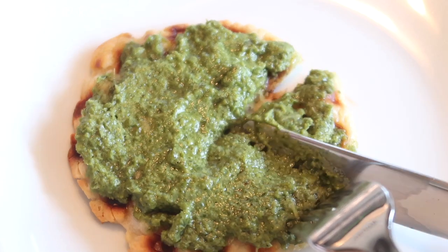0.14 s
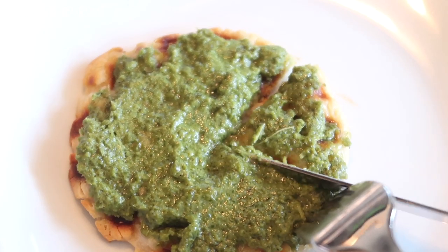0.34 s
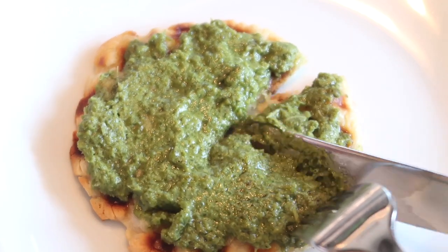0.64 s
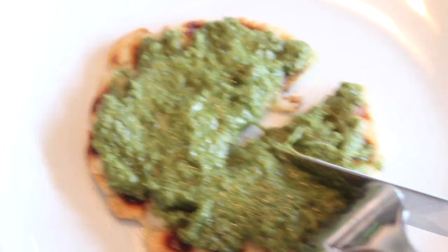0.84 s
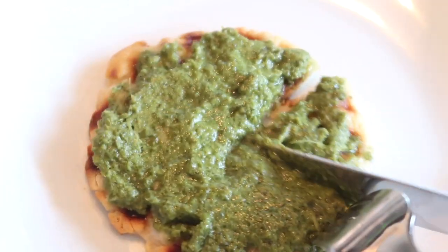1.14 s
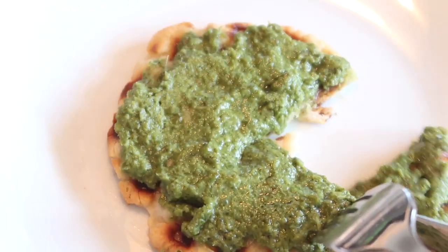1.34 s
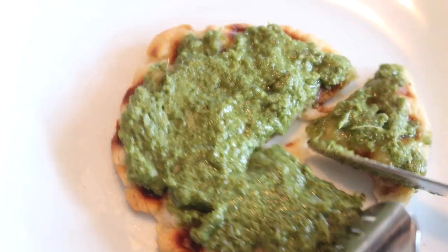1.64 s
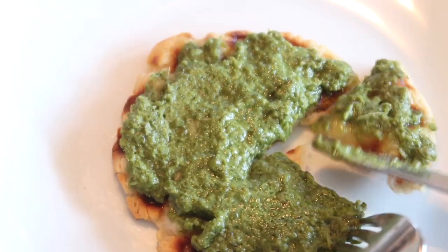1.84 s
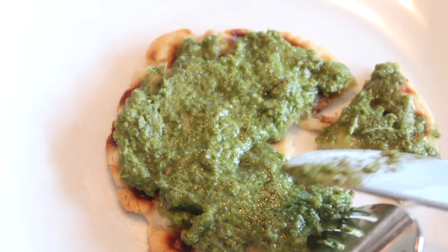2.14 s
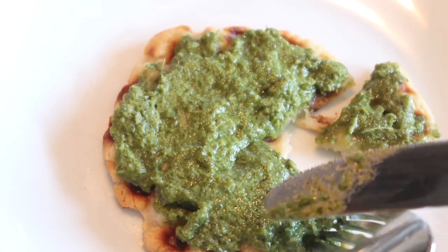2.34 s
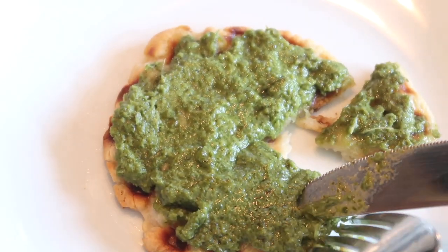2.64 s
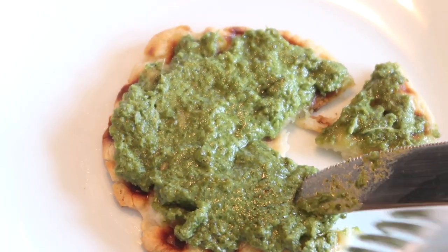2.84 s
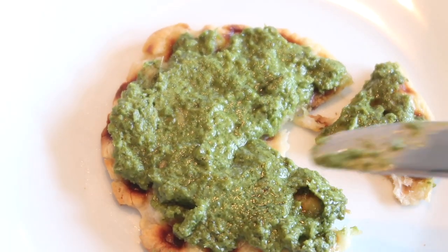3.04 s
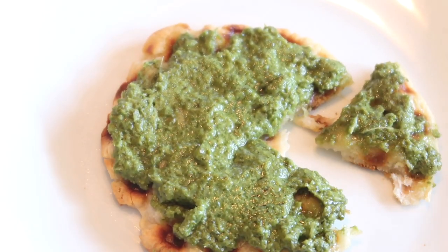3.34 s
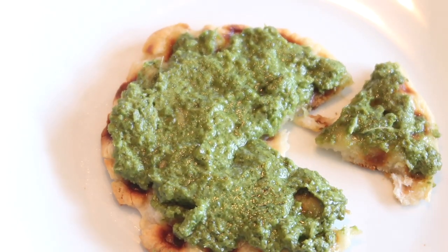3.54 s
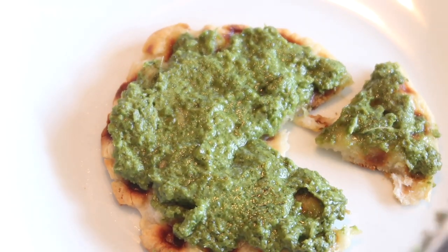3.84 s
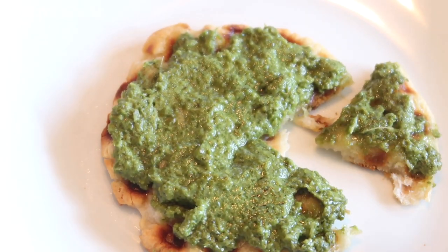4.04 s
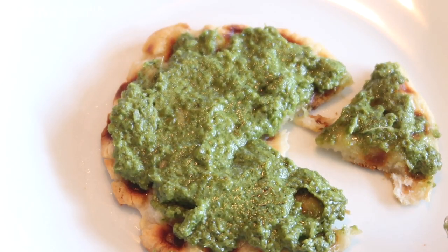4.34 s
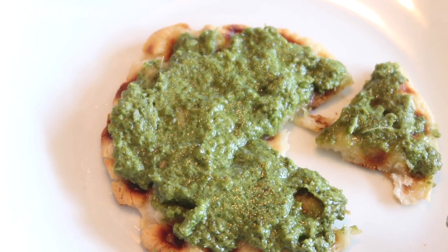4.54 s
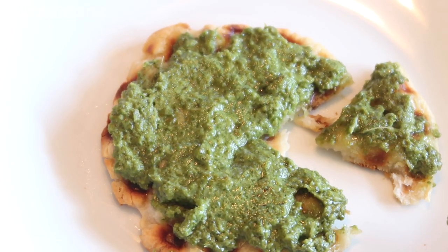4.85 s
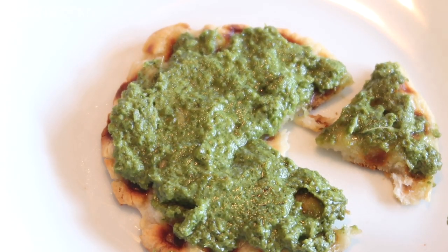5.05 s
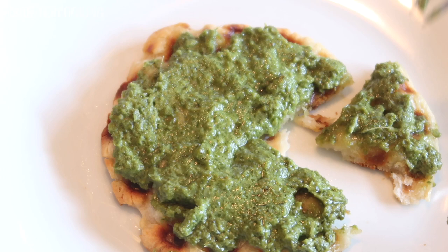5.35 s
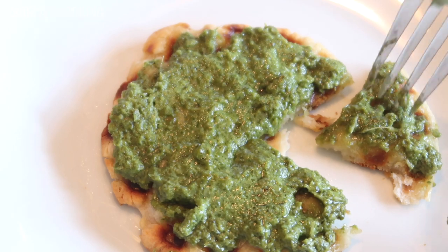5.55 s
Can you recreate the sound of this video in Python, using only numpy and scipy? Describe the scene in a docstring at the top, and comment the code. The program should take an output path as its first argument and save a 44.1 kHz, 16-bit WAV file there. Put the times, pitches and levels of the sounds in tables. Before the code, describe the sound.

Quiet gritty sawing and dull plate taps come first, with one sharper tap early on. Bright steel clinks and a light scrape follow. Near the end, knife and fork land on wood with hard knocks and a rattle that quickly settles. Close microphones, short room reflections, low appliance hum, faint high whine.

```python
"""A steel knife saws a small pizza on a china plate, is wiped on a fork, and both are laid on a wooden table.
Every contact rings damped modes of the steel, the plate or the table top, with a noise burst added.
Low thumps come through the microphone stand; a small kitchen answers with dense, decaying reflections.
Below lie a wavering appliance hum with droning bands, coloured room noise and a thin electronic whine.
Two close microphones listen."""
import sys
import numpy as np
from scipy import signal
from scipy.fft import rfft, irfft
from scipy.io import wavfile
from scipy.ndimage import uniform_filter1d

SR = 44100
rng = np.random.default_rng(int(sys.argv[2]) if len(sys.argv) > 2 else 0)


def boost(x):
    """Linear amplitude factor 10**(x/20) for a level x in decibels (scalar or array-like)."""
    u = np.asarray(x, float) / 20
    return 10 ** u


def put_to_file(sound):
    """Save the sound as 16-bit audio at rate SR, in the file named by the first command-line argument."""
    columns = np.atleast_2d(sound).T  # one column per channel
    safe = np.clip(columns, -1, 1)
    whole_steps = np.round(safe * 32767)
    wavfile.write(sys.argv[1], SR, whole_steps.astype(np.int16))


N = 250784

# All levels in the tables are relative: the gains of the signal path come on top. Contacts: taps on the plate
# (with one knock on the table at 2.97 s), clinks of the gripped cutlery, drops of the free cutlery on the
# table. Each row: start in seconds, crack level in dB, favoured pitch in Hz, ring level in dB, table push in
# dB.
TAPS = [(.023, -68, 1920, -52.5, -50), (.400, -25, 1810, -44, -30), (.402, -25, 4980, -48, -48),
        (.872, -48, 2900, -65, -29.5), (1.025, -49, 2530, -55, -38), (1.122, -54, 2400, -66, -25.5),
        (1.465, -51, 2810, -43.5, -48), (1.491, -45, 1710, -48, -28), (1.943, -34, 4200, -40, -47),
        (1.946, -44, 1280, -56, -50), (2.973, -55, 1151, -50, -46), (3.04, -52, 6430, -64, -36),
        (3.065, -41.5, 2580, -41.5, -25)]
KNIFE_CLINKS = [(2.243, -21, 2760, -29, -45), (2.333, -28, 1320, -42.5, -50),
                (2.338, -30.5, 6210, -56, -58)]
FORK_CLINKS = [(2.500, -19, 9150, -24, -43), (2.586, -52, 8740, -40.5, -55), (2.616, -29, 1660, -45, -50),
               (2.622, -37, 2880, -43, -57), (2.712, -43, 7200, -51, -57)]
KNIFE_DROPS = [(3.743, -29.5, 1390, -51, -5), (3.969, -63, 1390, -76, -36), (4.171, -16, 2780, -19, -17.5),
               (4.180, -14, 4130, -40, -37)]
FORK_DROPS = [(4.327, -22.5, 2550, -39.5, -43), (4.329, -32, 511, -29, -45), (4.332, -24.5, 3660, -43, -49),
              (4.387, -34, 2620, -40.5, -36), (4.431, -7.5, 4200, -25, -21),
              (4.438, -12.5, 1002, -24, -26.5), (4.445, -13, 2400, -18.5, -25),
              (4.452, -30, 6900, -27.5, -26), (4.482, -36, 5600, -43, -43), (4.501, -36, 2240, -45, -31),
              (4.520, -25.5, 3230, -49, -30), (4.540, -39.5, 490, -42, -30), (4.565, -43, 2250, -48, -36),
              (4.600, -44, 3690, -64, -28.5), (4.622, -54, 2240, -59, -36), (4.653, -54, 1280, -76, -30),
              (4.706, -63, 500, -69, -33.5)]
# The fork rocks to rest. Each row: time in seconds, steel level in dB, table level in dB.
ROCKING = [(4.46, -29, -15), (4.478, -22, -26.5), (4.538, -34, -23), (4.578, -41, -38), (4.73, -77, -47),
           (4.8, -84, -42)]
# Spectrum of contact noise. Each row: frequency in Hz, density in dB per Hz.
CRACK = [(500, 2.5), (1500, -15), (3000, 0), (6000, -3), (10000, -8.5), (12500, -9), (15000, -23)]


def plate():
    """Forced vibration: taps and knife teeth drive the damped plate; its lowest mode hums under pressure."""
    # Plate under the food. Each row: frequency in Hz, bandwidth in Hz, level in dB.
    plate_modes = [(834, 184, 12), (1630, 46, -6), (1810, 67, -6), (1910, 32, -10), (2420, 145, 3),
                   (3088, 40, -4.5), (3440, 25, -11), (4830, 40, -18), (5400, 120, -6), (6300, 30, -14),
                   (6900, 39, -27), (8300, 23, -19), (8760, 19, -23), (8600, 60, -11), (1280, 6, -14.5),
                   (2692, 120, -1), (4200, 21, -19), (4980, 13, -13.5)]
    # a resonance decays faster the wider it is
    modes = [(hz, db, np.log(1000) / (np.pi * width)) for hz, width, db in plate_modes]
    lowest = modes[:1]
    middle = [mode for mode in modes if 1000 < mode[0] < 4000]
    top = [mode for mode in modes if mode[0] > 4000]
    edge, low, fine, spot_hz = strokes()
    out = struck(modes, TAPS, focus_db=4.0, rise_t60=0.003)
    for group, gain in ((lowest, low), (middle, 0.31 * edge), (top, 1.37 * fine)):
        teeth = rubbed(group, gain, per_s=2500.0)
        for hz, level_db, t60 in group:
            # the favoured mode wanders as the edge moves across the plate
            moving = boost(level_db + favoured(hz, spot_hz, boost_db=14.0, octaves=0.19))
            out += ring(moving * teeth, hz, np.clip(t60, .01, .5))
    # part of the drag is plain hiss of steel on glaze
    hiss = rms_one(coloured(grit(3000.0, spread_db=2.5), lambda hz: at_hz(CRACK, hz)))
    return out + (0.25 * edge + .25 * fine) * hiss


def strokes():
    """Friction follows pressure: strokes press in, hold and lift; the strongest sets edge level and pitch."""
    # Strokes of the serrated edge over the plate. Each row: time of full pressure in seconds,
    # hold in seconds, edge level in dB, plate hum level in dB, favoured pitch in Hz.
    sawing = [(.032, .004, -48.5, -73, 2160), (0.093, .004, -53.5, -56, 2610),
              (0.873, .004, -57, -50, 2633), (0.941, .004, -52, -70, 2440), (1.000, .004, -65, -49, 2390),
              (1.055, 0.037, -50, -54, 2430), (1.142, .008, -48.5, -51.5, 2290),
              (1.246, 0.0036, -49, -46.5, 2400), (1.302, 0.058, -46.5, -54, 2390),
              (1.347, 0.062, -49, -44.5, 2840), (1.577, .022, -42, -43, 3060),
              (1.594, .012, -41, -40.5, 2920), (1.624, .02, -50, -45, 2420), (1.708, .004, -58, -65, 2700)]
    press_db_per_s, lift_db_per_s = 420.0, 327
    # fine grit at an edge level of -50 dB, and dB gained per dB of edge
    grit_db, grit_growth = -66.5, 1.43
    s, hold, edge_db, low_db, spot_hz = np.array(sawing).T[:, :, None]
    t = np.arange(N) / SR
    loss_db = press_db_per_s * np.maximum(s - t, 0) + lift_db_per_s * np.maximum(t - s - hold, 0)
    edge_db = edge_db - loss_db
    strongest_db = edge_db.max(axis=0)
    strongest_low_db = (low_db - loss_db).max(axis=0)
    fine_db = grit_db + grit_growth * (strongest_db + 50)
    spot_hz = uniform_filter1d(spot_hz[edge_db.argmax(axis=0), 0], size=800)
    return boost(strongest_db), boost(strongest_low_db), boost(fine_db), spot_hz


def cutlery():
    """Boundary conditions set the modes: a grip damps the steel and picks other modes than lying free."""
    # Modes of knife and fork. Each row: frequency in Hz, level in dB, t60 in seconds before any cap.
    gripped_knife = [(830, -13, .1), (1320, -19, .22), (2482, -3, .085), (2902, -16, .12), (3483, -6, .15),
                     (3763, -14, .15), (4253, -2, .07), (4673, -14, .12), (4845, -14, .15), (5103, -7, .09),
                     (6068, -1, .16), (7817, -16, .16), (8619, -15, .1), (9351, -16, .08),
                     (12220, -16, .06)]
    gripped_fork = [(1345, -16, .12), (1660, -19, .2), (2880, -14, .1), (3219, -8, .05), (3745, 0, .09),
                    (4180, -7, .09), (5095, -5, .05), (5265, -2, .1), (6040, -14, .1), (7120, -18, .15),
                    (7900, -16, .08), (8780, -14, .12), (9345, -16, .07), (9800, -11, .13),
                    (11300, -16, .07), (11800, -8, .13), (13380, -12, .07)]
    free_knife = [(672, -7, 0.091), (872, -27.5, 0.51), (993, -20.5, 0.52), (2315, -4, 0.25),
                  (3120, -27, 0.44), (3483, 2, 0.22), (3800, -12, 0.18), (4163, 2, 0.085),
                  (4815, 0.5, 0.07), (6051, -23, 0.17), (6228, -17.5, 0.24), (6934, -17.5, 0.14),
                  (7990, -13.5, 0.21), (8120, -19.5, 0.073), (8830, -11, 0.059), (9720, -11, 0.2),
                  (10580, -35.5, 0.1), (11500, -23, 0.104)]
    free_fork = [(492, -4.5, 0.22), (1036, -10, 0.082), (1340, -12.5, 0.46), (2241, -12, 0.24),
                 (3538, 2.5, 0.12), (3230, -3.5, 0.13), (3990, -3.5, 0.079), (4830, -8, 0.08),
                 (6570, -16, .13), (4164, -7, 0.071), (4730, -10.5, 1.1), (4956, -10, 0.1),
                 (5292, -33, 0.16), (6780, -10, 0.083), (8231, -31, 0.16), (9700, -15.5, 0.11),
                 (9800, -13, 0.074), (10700, -28, 0.089), (11700, -16, 0.031), (12330, -28, 0.073),
                 (14010, -21, 0.087), (2620, -10, 0.07), (3660, -12, .13)]
    # Blade wiped along the tines. Each row: time in seconds, level in dB.
    wiping_points = [(2.54, -44.5), (2.574, -46), (2.622, -41.5), (2.654, -61), (2.694, -54),
                     (2.718, -48.5), (2.8, -66)]
    wiping = gains_in_time(wiping_points)[0]
    rocking = gains_in_time(ROCKING)[0]
    knife_rub = rubbed(gripped_knife, .3 * wiping, per_s=910.0)
    fork_rub = rubbed(gripped_fork, .2 * wiping, per_s=1100.0)
    rocking_rub = rubbed(free_fork, 0.22 * rocking, per_s=400.0)
    out = struck(gripped_knife, KNIFE_CLINKS, knife_rub, rise_t60=0.022)
    out += struck(gripped_fork, FORK_CLINKS, fork_rub, rise_t60=0.021)
    out += struck(free_knife, KNIFE_DROPS)
    # the table damps the fork
    out += struck(free_fork, FORK_DROPS, rocking_rub, focus_db=0.5, longest_t60=0.16)
    hiss = rms_one(coloured(grit(2500.0, spread_db=-6.0), lambda hz: at_hz(CRACK, hz)))
    return out + (.7 * wiping + 0.16 * rocking) * hiss


def struck(modes, rows, rubbing=0, focus_db=0, rise_t60=0.013, longest_t60=0.59):
    """Modal synthesis: blows ring all modes with a short swell, and rubbing feeds them steadily."""
    s, spot_hz, ring_db = np.array(rows)[:, [0, 2, 3]].T
    at, out = np.round(s * SR).astype(int), np.zeros(N)
    for hz, level_db, t60 in modes:
        # modes lose focus_db per octave away from the favoured pitch
        distance = np.abs(np.log2(hz / spot_hz))
        clicks = np.zeros(N)
        clicks[at] = boost(ring_db + favoured(hz, spot_hz) - focus_db * distance)
        # each mode has weaker close neighbours, so the ring beats as it fades
        for twin_db, split in ((4, 1), (-8.5, 1.005), (-10.5, .991)):
            sounding = ring(clicks + rubbing, hz * split, np.clip(t60, .01, longest_t60))
            # a quickly dying copy is taken away, which softens the onset
            onset = ring(clicks, hz * split, rise_t60)
            out += boost(level_db + twin_db) * (sounding - onset)
    return out


def ring(clicks, hz, t60):
    """Damped resonator: a unit click starts a decaying sine of initial height 1."""
    r, w = boost(-60 / (t60 * SR)), 2 * np.pi * hz / SR
    return signal.lfilter([0, np.sin(w)], [1, -2 * r * np.cos(w), r * r], clicks + 1e-18)


def favoured(hz, spot_hz, boost_db=15.0, octaves=.07):
    """Mode coupling: extra strength in dB of a mode near the pitch that the contact spot favours."""
    return boost_db * np.exp(-(np.log2(hz / spot_hz) / octaves) ** 2)


def grit(per_s, spread_db):
    """Rough contact as a random pulse train: dense uneven clicks of either sign, at rms 1."""
    sizes = boost(spread_db * np.minimum(rng.exponential(1, N), 5)) * rng.choice([-1, 1], N)
    return rms_one(sizes * (rng.random(N) < per_s / SR))


def rubbed(modes, gain, per_s):
    """Power balance: grit is divided by the estimated noise gain of the modes it feeds."""
    power = 0
    for hz, db, t60 in modes:
        power += boost(db) ** 2 * np.clip(t60, .01, .5) * SR / (4 * np.log(1000))
    return gain * grit(per_s, spread_db=5.0) / np.sqrt(power)


def cracks(rows, t60, tail_t60, tail_db):
    """Impact noise: a short burst humped around the favoured pitch, then a weaker, longer rustle."""
    t, out = np.arange(SR // 4) / SR, np.zeros(N + SR)
    decay = boost(-60 * t / t60) + boost(tail_db - 60 * t / tail_t60)
    shape = decay * np.clip(t / 0.00044, 0, 1)
    for (s, crack_db, spot_hz), noise in zip(rows, rng.standard_normal((len(rows), len(t)))):
        colour = coloured(noise, lambda hz: at_hz(CRACK, hz) + favoured(hz, spot_hz, boost_db=12.5, octaves=0.3))
        out[round(s * SR):][:len(t)] += boost(crack_db) * shape * rms_one(colour) / 2
    return out[:N]


def table(rows, rocking):
    """Force pulse on a modal board: a longer, softer push excites only the lowest modes."""
    # Main modes of the table top. Each row: frequency in Hz, level in dB, t60 in seconds.
    board_modes = [(170, -12, 0.13), (222, -45, 0.13), (324.6, 8, 0.082), (387, 3.5, 0.098),
                   (513.5, -0.5, 0.08), (622, -20, 0.08), (714, -39, 0.071), (797, -0.5, 0.061),
                   (1016, -12.5, 0.068), (1223, -15, 0.072), (1443, 1.5, 0.023), (2100, -14, .06),
                   (2680, -13, 0.023)]
    # Many small modes of the top and what stands on it. Each row: frequency in Hz, density in dB per Hz.
    rustle_spectrum = [(80, 3), (150, -3.5), (205, -14), (300, -2.5), (800, -9.5), (1500, -15.5),
                       (2500, -25.5), (5000, -33)]
    rustle_t60 = 0.28  # s
    force, ms = np.zeros(N), np.arange(1, SR // 50) / SR * 1000
    for s, table_db, rise_ms in rows:
        push = np.sin(np.pi * np.clip(ms / max(2 * rise_ms, .1), 0, 1)) ** 2
        force[round(s * SR):][:len(push)] += boost(table_db) * push / push.sum()
    force = force / 2 + rubbed(board_modes, rocking, per_s=390.0)
    t = np.arange(SR // 2) / SR
    rustle = rms_one(coloured(rng.standard_normal(len(t)), lambda hz: at_hz(rustle_spectrum, hz)))
    rustle = boost(-7.5) * rustle * boost(-60 * t / rustle_t60)
    out = sum(boost(db) * ring(force, hz, t60) for hz, db, t60 in board_modes)
    out = out + signal.fftconvolve(force, rustle)[:N]
    # low cut at 90 Hz: the microphones pass little of the knocks' deep bass
    return signal.sosfilt(signal.butter(4, 90.0, "high", fs=SR, output="sos"), out)


def stand_thumps():
    """Structure-borne resonance: contacts shake the microphone stand, low and short with a slow onset."""
    # Each row: time in seconds, level in dB.
    thumps = [(0.404, -31), (.875, -28.5), (1.096, -32), (1.500, -28.5), (1.530, -25), (1.944, -32),
              (2.510, -27), (3.080, -35.5), (3.745, -24), (4.178, -18.5), (4.443, -19), (4.470, -29)]
    # Resonances of the stand. Each row: frequency in Hz, level in dB, t60 in seconds.
    stand_modes = [(112.8, 1, 0.18), (149.2, 0.5, 0.13)]
    pushes, out = np.zeros(N), np.zeros(N)
    for s, level_db in thumps:
        pushes[round(s * SR)] = boost(level_db)
    for hz, db, t60 in stand_modes:
        out += boost(db) * (ring(pushes, hz, t60) - ring(pushes, hz, 0.043))
    return out


def rms_one(x):
    """Normalisation: scale to unit root mean square."""
    return x / np.sqrt(np.mean(x ** 2) + 1e-20)


def at_hz(points, hz):
    """Spectral interpolation: read a curve on a log-frequency axis."""
    return np.interp(np.log(hz), np.log(np.array(points)[:, 0]), np.array(points)[:, 1])


def gains_in_time(rows):
    """Envelopes linear in dB: gain curves of the level columns, silent outside the table."""
    s, *columns = np.transpose(rows)
    t = np.arange(N) / SR
    return np.array([boost(np.interp(t, s, column, left=-200, right=-200)) for column in columns])


def coloured(x, spectrum_db):
    """Linear filtering in the frequency domain by a gain in dB given as a function of Hz."""
    size = x.shape[-1]
    return irfft(rfft(x) * boost(spectrum_db(np.fft.rfftfreq(size, 1 / SR) + 1)), size)


def close_pair(x, lag_us, pan_db):
    """Stereo cues: a small delay and level difference between the two microphones."""
    # half the lag is put on either side
    lags = lag_us * 1e-6 * np.array([[1], [-1]])
    turn = np.exp(-1j * np.pi * np.fft.rfftfreq(N, 1 / SR) * lags)
    return irfft(rfft(x) * turn, N) * boost(np.array([[pan_db / 2], [-pan_db / 2]]))


def kitchen(x):
    """Reverberation: dense reflections after a short gap, each octave dying at its own rate."""
    # Each row: frequency in Hz, reverberation time t60 in seconds.
    kitchen_t60 = [(100, 0.76), (1000, 0.44), (4000, 0.44), (12000, 0.23)]
    t, echo = np.arange(SR // 2) / SR, 0
    for centre in 62.5 * 2 ** np.arange(9):
        octave = diffuse(len(t), lambda hz: np.abs(np.log2(hz / centre)) < .5, near=3)
        echo = echo + octave * boost(-60 * t / at_hz(kitchen_t60, centre))
    echo = echo * np.clip((t - .004) / 0.02, 0, 1)
    echo = echo / np.sqrt(np.sum(echo ** 2) / 2)
    return signal.fftconvolve(x[None], echo, axes=1)[:, :N]


def diffuse(size, band, near=1):
    """Diffuse-field coherence: noise alike on both sides in the bass, not in the treble."""
    # Each row: frequency in Hz, left-right correlation from -1 to 1.
    likeness = [(40, .9999), (70, .9995), (110, 1), (200, 0.9), (370, 0.69), (690, 0.31), (1300, -0.12),
                (4000, 0.036), (12000, -0.47)]
    hz = np.fft.rfftfreq(size, 1 / SR) + 1
    alike = np.clip(at_hz(likeness, hz / near), -1, 1)
    mid, side = rfft(rng.standard_normal((2, size)))
    pair = np.sqrt(1 + alike) * mid + np.sqrt(1 - alike) * side * [[1], [-1]]
    return irfft(band(hz) * pair, size)


def background():
    """Superposed steady sources: room air, appliance drone, wavering hum and a whine opposed in phase."""
    # Room air. Each row: frequency in Hz, density in dB per Hz.
    air_spectrum = [(12, -54), (20, -22), (43, -13.5), (80, -9.5), (94, -11), (108, -16.5), (141, -15),
                    (222, -24.5), (254, -17), (291, -21.5), (380, -23.5), (685, -30.5), (2680, -39.5),
                    (12000, -54), (15600, -58), (22000, -120)]
    # Appliance drone. Each row: frequency in Hz, bandwidth in Hz, level in dB.
    drone_bands = [(34.8, 12, -52.5), (260, 12.3, -54), (381.4, 18, -59)]
    # Wavering hum. Each row: time in seconds, level in dB.
    hum_points = [(0, -38.5), (.27, -42.5), (.52, -44), (.55, -33.5), (.73, -50.5), (.77, -43.5),
                  (1.2, -52), (1.27, -41.5), (1.7, -54), (1.83, -37), (1.93, -50), (2.08, -37.5),
                  (2.59, -43), (2.67, -59), (2.76, -37), (3.02, -42), (3.17, -35.5), (3.51, -37.5),
                  (3.65, -55), (3.9, -41.5), (4.7, -51), (5.06, -59.5), (5.2, -47.5), (5.69, -47)]
    air_db = -46  # rms of the two sides' mean from 100 to 1500 Hz
    hum_hz, hum_wander_hz = 77.3, 1.22
    whine_hz, whine_db = 13006, np.array([[-60.5], [-68.5]])  # left, right

    air = diffuse(N, lambda hz: boost(at_hz(air_spectrum, hz)))
    bandpass = signal.butter(4, [100, 1500], "band", fs=SR, output="sos")
    band = signal.sosfilt(bandpass, air.mean(axis=0))
    out = air / np.std(band) * boost(air_db)
    for centre_hz, width, level_db in drone_bands:
        drone = diffuse(N, lambda hz: 1 / (1 + (2 * (hz - centre_hz) / width) ** 2))
        out += boost(level_db) * rms_one(drone)
    t = np.arange(N) / SR
    wander = np.interp(t, np.linspace(0, N / SR, num=24), rng.standard_normal(size=24))
    phase = 2 * np.pi * np.cumsum(hum_hz + hum_wander_hz * wander) / SR
    hum_gain = uniform_filter1d(gains_in_time(hum_points)[0], size=1500)
    out += np.sqrt(2) * hum_gain * np.sin(phase)
    return out + boost(whine_db) * [[1], [-1]] * np.sin(2 * np.pi * whine_hz * t)


def scene():
    """Superposition: direct sound of all contacts, the reverberation and the background."""
    # rise of the push in ms: slow through plate and food or a hand, sharper from bare knife and fork
    kinds = ((TAPS + KNIFE_CLINKS + FORK_CLINKS, 2.57), (KNIFE_DROPS, 0.12), (FORK_DROPS, 0.52))
    pushes = [(row[0], row[-1], rise_ms) for rows, rise_ms in kinds for row in rows]
    contacts = [row[:3] for rows, rise_ms in kinds for row in rows]
    low = table(pushes, 0.48 * gains_in_time(ROCKING)[1]) + stand_thumps()
    snaps = cracks(contacts, t60=.03, tail_t60=.12, tail_db=-9.0)
    bright = plate() + cutlery() + snaps
    direct = close_pair(bright, lag_us=25.0, pan_db=0.0) + close_pair(low, lag_us=34.6, pan_db=-.1)
    return direct + boost(-16.5) * kitchen(bright + low) + background()


def roll_off(x):
    """The treble ends steeply here."""
    return signal.sosfilt(signal.butter(12, 15150, fs=SR, output="sos"), x)


def record(dry):
    """Soft saturation: a tanh curve rounds the peaks, and what remains above full scale is clipped."""
    rounded = 1.326 * np.tanh(dry / 1.254)
    mix = np.clip(rounded, -1, 1)
    return roll_off(mix)


dry = scene()
out = record(dry)
put_to_file(out)
```